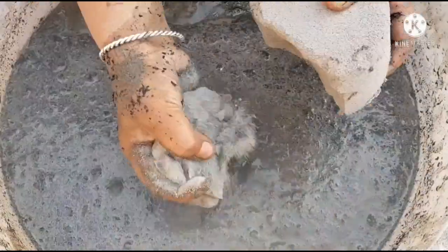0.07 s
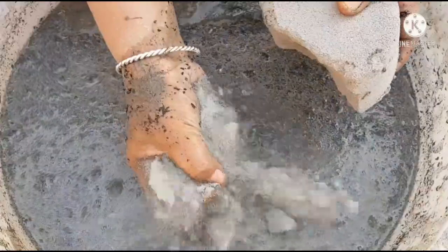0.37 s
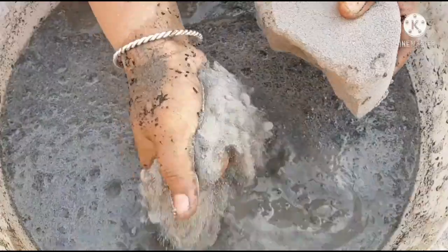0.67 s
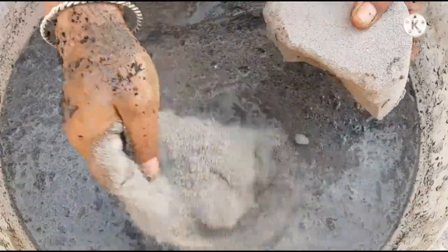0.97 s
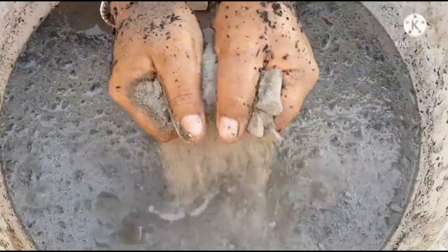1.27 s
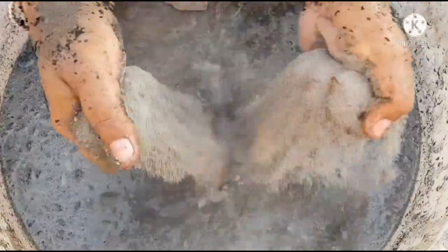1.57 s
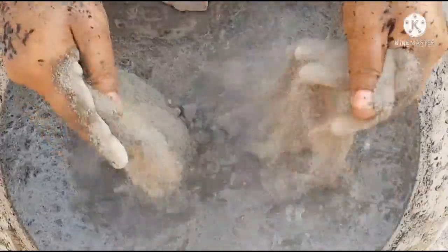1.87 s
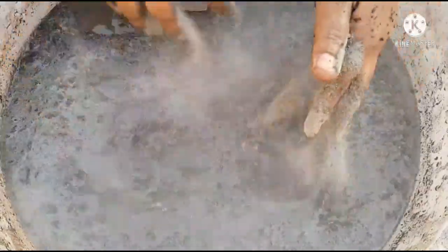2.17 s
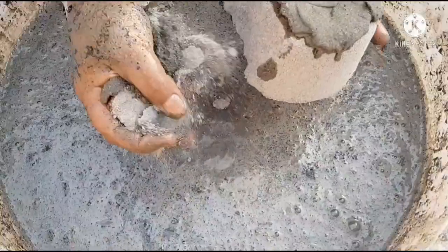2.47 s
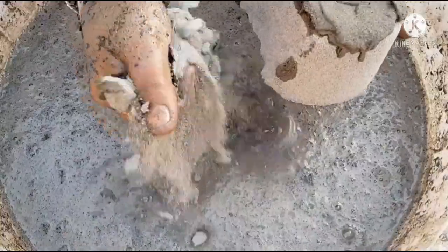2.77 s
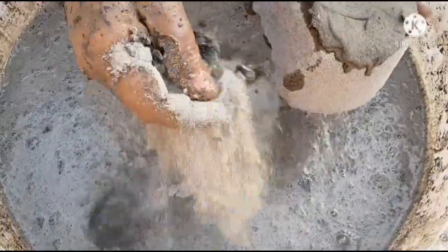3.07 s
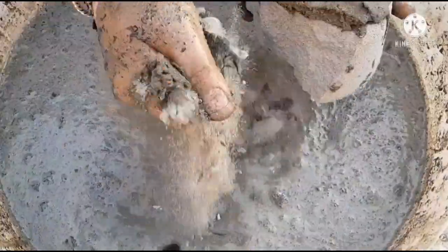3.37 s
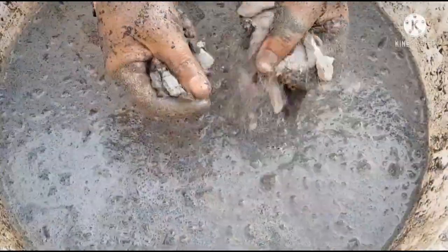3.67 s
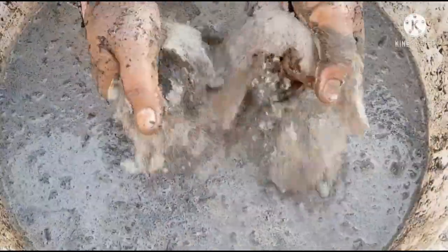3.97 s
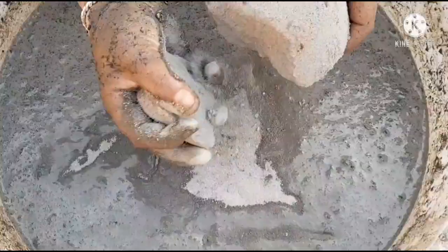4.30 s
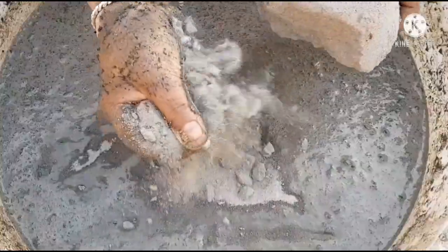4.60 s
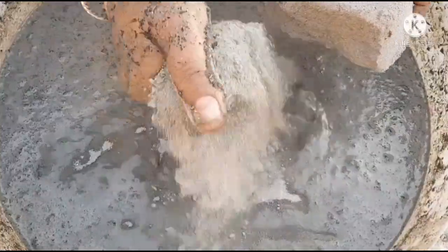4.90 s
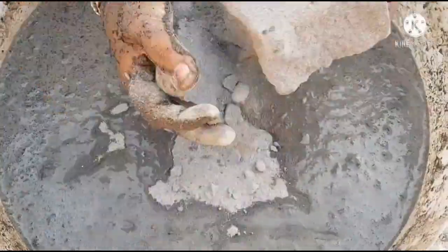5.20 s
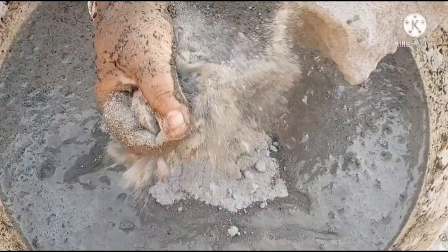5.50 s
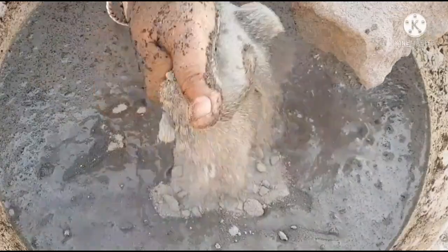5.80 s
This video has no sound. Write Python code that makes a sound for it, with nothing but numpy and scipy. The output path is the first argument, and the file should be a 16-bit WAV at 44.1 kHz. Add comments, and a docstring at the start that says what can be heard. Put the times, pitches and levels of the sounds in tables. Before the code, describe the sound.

Hands crush lumps of dry cement over a basin of muddy water, outdoors and close to the microphone. Each squeeze gives a gritty crunch over hissing powder, with sharp snaps, while larger pieces drop in with dull plops. Just past the middle comes the loudest crack, then wind rumbles briefly on the microphone and stops dead. The crumbling continues more softly, with a faint slosh and tiny wet pops.

```python
"""Outdoors, close to one microphone, hands crush lumps of dry cement over a basin of muddy water.
Each squeeze breaks many tiny grains, heard as a crunch over hissing powder, and lumps crack with sharp
snaps. Larger pieces drop in and knock the filled basin with dull plops; later the mud sloshes and pops.
A gust rumbles on the microphone for most of a second and stops dead. Faint air lies behind it all."""
import sys
import numpy as np
from scipy import signal
from scipy.fft import rfft, irfft, next_fast_len
from scipy.io import wavfile
from scipy.ndimage import uniform_filter1d

SR = 44100
rng = np.random.default_rng(int(sys.argv[2]) if len(sys.argv) > 2 else 0)


def output_pcm(signal):
    """Save a mono or channel-first signal as 16-bit PCM at the path in sys.argv[1].

    Samples are clipped to [-1, 1] before scaling.
    """
    pcm = np.clip(np.atleast_2d(signal).T, -1, 1) * 32767
    wavfile.write(sys.argv[1], SR, np.round(pcm).astype(np.int16))


N = 266805

# steady grinding between the fingers: (time [s], level [dB])
GRINDING = [(0, -28.5), (0.28, -39.5), (0.45, -37), (1.1, -29), (2.17, -31), (2.29, -38), (2.36, -39),
            (2.6, -29.5), (2.95, -29.5), (3.1, -33.5), (3.9, -32), (4.25, -30), (4.72, -39), (4.93, -35),
            (5.05, -39), (5.4, -42.5), (5.65, -37), (6.05, -37)]
# a lump gives way under a squeeze: (time of peak [s], level [dB], swell [s], fade [s])
SQUEEZES = [(0.12, -25.5, 0.33, 0.13), (0.395, -19.5, 0.039, 0.034), (0.49, -19.5, 0.028, 0.081),
            (0.694, -20.5, 0.017, 0.0088), (1.16, -24, 0.018, 0.064), (1.264, -16.5, 0.037, 0.062),
            (1.571, -21, 0.0072, 0.017), (1.684, -24.5, .03, 0.017), (2.15, -31, 0.023, 0.065),
            (2.385, -23.5, .01, 0.012), (2.43, -22.5, 0.014, .025), (2.52, -23, 0.0095, 0.016),
            (2.656, -25, 0.098, 0.13), (2.799, -24, 0.025, 0.027), (3.02, -26.5, 0.089, 0.023),
            (3.2, -23.5, 0.086, 0.081), (3.315, -24.5, 0.05, 0.035), (3.448, -25.5, 0.049, 0.1),
            (3.651, -22, .02, 0.032), (3.82, -25.5, 0.086, .05), (3.936, -24.5, 0.023, 0.036),
            (4.063, -24.5, 0.062, 0.076), (4.33, -29.5, 0.17, 0.046), (4.475, -28, 0.071, 0.1),
            (4.654, -30.5, 0.055, 0.019), (4.77, -32.5, 0.035, 0.026), (4.83, -30.5, 0.022, 0.054),
            (4.968, -29.5, 0.028, 0.027), (5.223, -31, 0.053, 0.13), (5.456, -27.5, .025, 0.026),
            (5.537, -27.5, 0.016, 0.018), (5.63, -34, 0.042, 0.013), (5.686, -24.5, 0.025, 0.036),
            (6.025, -34, 0.015, 0.03)]
# how fine the cement is: (time [s], treble tilt [dB per octave], pitch of the largest grains [Hz])
GRAIN_FINENESS = [(0.0, 3, 3070), (0.26, 1.7, 3600), (0.5, -0.5, 3080), (0.88, -2.5, 2950),
                  (0.98, 0.5, 3140), (1.4, -2, 2730), (1.8, 0.5, 3350), (1.92, 0.5, 2580), (2.33, 0, 3770),
                  (2.82, 0.2, 2720), (3.19, 3.5, 3140), (3.34, -1, 2040), (3.41, 0.5, 3100),
                  (3.81, 2.5, 2630), (3.89, -2, 3270), (4.7, -5.5, 3670), (5.24, -1, 3720),
                  (6.05, -6, 3820)]
# basic tone of the crunch: (frequency [Hz], relative level [dB])
CRUNCH_SPECTRUM = [(300, -40), (1000, -18), (1600, -9.5), (2300, -5), (3200, -7.5), (3800, -4), (4450, 2),
                   (5600, -7), (7000, 3), (8200, 0.5), (9700, -6), (11400, -5), (13500, -12), (15300, -31)]
# the loud cracks: (time [s], level [dB], pitch of the fragment [Hz], level of loose crumbs [dB])
LOUD_CRACKS = [(0.3706, -13, 6100, -15), (0.5023, -13.5, 5250, -22), (0.5714, -16.5, 4400, -18.5),
               (0.6233, -16.5, 6900, -24.5), (0.668, -14, 5470, -25), (0.727, -20, 6300, -29),
               (0.739, -8.5, 5240, -18), (0.9144, -20.5, 5400, -28), (0.9462, -22.5, 5500, -35),
               (1.0124, -17, 7200, -37), (1.0308, -21, 7200, -38), (1.077, -26, 5830, -17),
               (1.1113, -24, 6900, -32), (1.1533, -17, 7200, -36), (1.235, -9.5, 5300, -21),
               (1.2748, -13, 4700, -15), (1.296, -12, 4740, -29), (1.3082, -10.5, 4400, -18),
               (1.422, -22, 5850, -30), (1.476, -18, 5470, -29), (1.5202, -14, 4400, -28),
               (1.5283, -14.5, 5200, -25), (1.5703, -12, 4700, -27), (1.5761, -12, 5240, -28),
               (1.6265, -8, 4400, -18), (1.6468, -18.5, 8600, -35), (1.6857, -16, 11000, -32),
               (1.7316, -18.5, 6100, -25), (1.7793, -15.5, 5300, -23), (1.8686, -8.5, 5550, -23),
               (1.8818, -18, 7200, -24), (1.9075, -21, 7200, -21.5), (1.9539, -22, 10000, -31),
               (1.9912, -18, 6540, -29), (2.0005, -24, 7400, -34), (2.0358, -14.5, 7250, -37),
               (2.0777, -14, 7700, -25), (2.0958, -28, 6300, -19), (2.1048, -18.5, 6500, -33),
               (2.14, -16, 7200, -26), (2.193, -14, 7900, -42), (2.2044, -10.5, 7200, -38),
               (2.253, -23, 7200, -22.5), (2.2742, -17, 7800, -39), (2.5654, -27, 6300, -18.5),
               (2.655, -19.5, 7000, -23), (2.7196, -15, 6540, -23), (2.799, -15.5, 6900, -17.5),
               (2.8362, -19, 8300, -19.5), (2.922, -13.5, 7240, -21), (2.9463, -14, 7200, -20),
               (2.9788, -16, 8000, -28), (3.0326, -11.5, 5670, -13.5), (3.0412, -18, 8500, -19),
               (3.0668, -18, 6040, -34), (3.2246, -7.5, 11200, -16.5), (3.2313, -14, 9300, -14),
               (3.2685, -15.5, 6050, -18), (3.2791, -22, 8200, -18), (3.3063, -13.5, 6500, -21),
               (3.3185, -16, 4600, -15), (3.3327, -9.5, 8200, -23), (3.3408, -22, 6200, -18),
               (3.3588, -1.5, 6900, -9.5), (3.4818, 3.5, 4640, -11.5), (3.4848, -8, 5340, -27),
               (3.4975, -16.5, 7400, -37), (3.5475, -15, 7200, -22), (3.6922, -15, 6700, -18),
               (3.7148, -14.5, 6300, -24), (3.7562, -15, 6350, -24.5), (3.777, -15.5, 6460, -35),
               (3.8242, -7.5, 6900, -12), (3.8477, -30, 5730, -17), (4.0913, -14.5, 5100, -19.5),
               (4.4795, -17, 5470, -22), (4.9556, -21, 4700, -18.5), (4.959, -18.5, 6650, -18),
               (5.0714, -30, 5330, -31), (5.176, -28.5, 5600, -35), (5.2104, -25, 6950, -35),
               (5.333, -28, 7300, -36), (5.37, -27, 11000, -40), (5.6581, -20.5, 5870, -33),
               (5.684, -18.5, 5700, -20), (5.7429, -19.5, 5270, -25), (5.9564, -23, 4800, -24.5),
               (6.013, -27, 5530, -28)]
# fixed high resonances, probably of the microphone, that colour each snap:
# (pitch [Hz], width [Hz], relative level [dB])
MICROPHONE_RESONANCES = [(4423, 930, -1.5), (7245, 3250, 0.5), (10680, 4200, 0.5)]
# pieces that drop into the water: (time [s], level [dB], centre pitch of the knock [Hz])
FALLING_PIECES = [(0.5028, -9, 420), (0.531, -18.5, 400), (0.669, -26.5, 336), (0.69, -30.5, 310),
                  (0.7394, -15, 330), (1.252, -15, 510), (1.2748, -6, 515), (1.295, -17.5, 444),
                  (1.3081, 2, 503), (1.578, -30, 586), (1.627, -23, 209), (1.657, -32.5, 210),
                  (1.869, -27, 427), (3.335, -34, 750), (3.342, -25, 750), (3.358, -16.5, 834),
                  (3.4841, -16.5, 313), (3.487, -20.5, 810), (3.661, -31.5, 586), (3.718, -34, 600),
                  (3.824, -33.5, 800), (4.048, -23, 432), (4.058, -22, 430)]
# the ways the filled basin rings: (pitch [Hz], relative level [dB], time to fade by 60 dB [s])
BASIN_RESONANCES = [(237, 0.5, 0.038), (484, 7, 0.014), (677, -3, .024), (1082, 5.5, 0.014)]
# soft sloshing of the mud: (time [s], level [dB])
SLOSH_LEVELS = [(4.75, -85), (4.79, -45.5), (4.86, -42), (4.92, -53), (5.0, -67), (6.05, -60)]
# small wet pops: (time [s], peak level [dB])
MUD_POPS = [(5.06, -37), (5.072, -37.5), (5.955, -43), (5.984, -37.5)]
# wind on the microphone: (time [s], level [dB])
GUST_LEVELS = [(3.66, -77), (3.72, -55), (3.79, -32), (3.96, -33.5), (4.015, -16.5), (4.06, -27.5),
               (4.25, -19.5), (4.38, -27), (4.415, -11), (4.54, -18)]
# tone of the wind's rumble: (frequency [Hz], relative level [dB])
WIND_SPECTRUM = [(20, -41), (33, -10), (47, -2), (62, 3), (80, -5), (120, -10), (165, -19.5), (300, -30),
                 (600, -51), (2000, -84), (8000, -92)]
# tone of the outdoor air: (frequency [Hz], relative level [dB])
AIR_SPECTRUM = [(20, -30), (40, 0.5), (65, 1.5), (120, -1), (250, -7), (500, -10.5), (1000, -18.5),
                (2000, -22), (6000, -21.5), (16000, -27)]


def crunch(pressure, steady, cracks, clump_db, powder_db, crumbs_db, scatter_db, leak_db):
    """Grains break in clumps over hissing powder; fine dust is brighter, coarse grit reaches lower."""
    shower = np.hypot(pressure, crumb_showers(cracks, rise_s=0.00021, fade_s=0.042)) - pressure
    # a surge breaks off coarser grit: each doubling of the crunch makes it duller and lower
    doublings = np.log2((pressure + shower) / steady)
    tilt, edge_hz = in_time(GRAIN_FINENESS)
    tilt = tilt - 1.47 * doublings
    edge_hz = edge_hz * 2 ** (-0.027 * doublings)
    breaking = grains(per_s=3800, spread_db=-1.5, largest=12.0) * from_db(clump_db * drift(170))
    # a crumb collapses in a burst of noise about 2 ms long
    collapses = np.abs(grains(per_s=180, spread_db=6.0, largest=0.98))
    bursts = signal.lfilter([1], [1, -np.exp(-1 / (0.0018 * SR))], collapses + 1e-18)
    crumbs = from_db(crumbs_db) * unit_power(bursts * rng.standard_normal(N))
    powder = from_db(powder_db) * rng.standard_normal(N)
    source = colour(breaking + crumbs + powder, CRUNCH_SPECTRUM)
    # every grain has its own tone, so overlapping pitch bands waver separately
    centres_hz = np.geomspace(1400, 14000, num=17)
    size = next_fast_len(N, real=True)
    spectrum, grit = rfft(source, size), 0
    log_hz = np.log(np.linspace(1, SR / 2, len(spectrum)))
    for hz, share in zip(centres_hz, np.eye(len(centres_hz))):
        band = irfft(spectrum * np.interp(log_hz, np.log(centres_hz), share), size)[:N]
        # almost nothing rings below the pitch of the largest grains
        above_edge = np.sqrt(1 / (1 + (edge_hz / hz) ** 20) + from_db(leak_db) ** 2)
        band_db = tilt * np.log2(max(hz, 3000) / 6500) + scatter_db * drift(120)
        grit = grit + band * above_edge * from_db(band_db)
    # the hand's pressure sets how much breaks; a shower is denser and more even
    out = pressure * levelled(grit, size=1300) + shower * levelled(grit, size=130)
    return cut(out, 620, "high", order=2)


def hand_pressure():
    """Squeezes swell and fade on top of steady grinding; gives the total and the steady part."""
    t = np.arange(N) / SR
    steady = from_db(in_time(GRINDING)[0])
    power = steady ** 2
    for s, db, swell_s, fade_s in SQUEEZES:
        squeeze = from_db(db) * np.exp(-np.maximum((s - t) / swell_s, (t - s) / fade_s))
        power = power + squeeze ** 2
    return np.sqrt(power), steady


def grains(per_s, spread_db, largest):
    """Tiny breaks click at random moments, each with a random strength."""
    sizes = from_db(spread_db * np.minimum(rng.exponential(1, N), largest)) * rng.choice([-1, 1], N)
    return unit_power(sizes * (rng.random(N) < per_s / SR))


def crumb_showers(cracks, rise_s, fade_s):
    """Strength of the crumbs each crack lets go: it swells at once, then falls 60 dB in fade_s."""
    power, t = np.zeros(N), np.arange(SR // 20) / SR
    for s, *_, crumbs_db in cracks:
        shower = from_db(crumbs_db - 60 * t / fade_s) * (1 - np.exp(-t / rise_s))
        add(power, s, shower ** 2)
    return np.sqrt(power)


def snaps(cracks, detune, fall_db_per_octave, ping_db):
    """A crack's quick pushes set off high resonances, probably of the microphone, for an instant."""
    out = np.zeros(N)
    for (s, db, fragment_hz, _), chance in zip(cracks, rng.standard_normal((len(cracks), 4))):
        pushes = crack_steps(count=5, mean_gap_s=0.0007, step_loss_db=7)
        # the resonance nearest the fragment's pitch is pushed hardest
        octaves_off = np.abs(np.log2(np.array(MICROPHONE_RESONANCES)[:, 0] / fragment_hz))
        levels_db = db - fall_db_per_octave * (octaves_off - octaves_off.min())
        for k, (hz, width_hz, ring_db) in enumerate(MICROPHONE_RESONANCES):
            pitch = hz + detune * width_hz * chance[k]
            ring = double_resonance(pushes, pitch, width_hz)
            ring = ring / np.std(ring[:SR // 500])  # the first 2 ms set the level
            add(out, s, np.sign(chance[-1]) * from_db(levels_db[k] + ring_db) * ring)
    # the lowest resonance lingers as a short ping
    out = out + from_db(ping_db) * resonance(out, MICROPHONE_RESONANCES[0][0], width_hz=180)
    return cut(cut(out, 1230, "high", order=3), 13100, "low", order=4)


def crack_steps(count, mean_gap_s, step_loss_db):
    """The pushes of one crack: a first break, then weaker ones at uneven gaps."""
    pushes, luck = np.zeros(SR // 100), rng.random((count, 2))
    gaps_s = mean_gap_s * (.5 + luck[:, 0])
    at = np.minimum((np.cumsum(gaps_s) - gaps_s[0]) * SR, len(pushes) - 1).astype(int)
    pushes[at] = from_db(-step_loss_db * np.arange(count)) * np.sign(luck[:, 1] - .5)
    return pushes


def small_cracks(pressure, most_per_s, firm_db, pitch_hz, crumbs_db):
    """Small cracks come by chance, more often and louder under a firm squeeze; rows like LOUD_CRACKS."""
    step = SR // 200
    moments = np.arange(0, N, step)
    luck, chance = rng.random(len(moments)), rng.standard_normal((len(moments), 2))
    per_s = most_per_s * np.minimum(pressure[moments] / from_db(firm_db), 1) ** 2
    db = 20 * np.log10(pressure[moments]) - 0.5 * chance[:, 0]
    hz = pitch_hz * 2 ** (0.1 * chance[:, 1])
    return np.column_stack([moments / SR, db, hz, db + crumbs_db])[luck < per_s * step / SR]


def basin_echoes(x, echo_db, fade_s):
    """Hands, water surface and basin wall throw back a short spray of echoes."""
    t = np.arange(SR // 12) / SR
    echoes = rng.standard_normal(len(t)) * from_db(-60 * t / fade_s) * (t > .001)
    return x + from_db(echo_db) * signal.fftconvolve(x, echoes / np.linalg.norm(echoes))[:N]


def plops(rise_s, reach_octaves, churn_db, churn_fade_s):
    """A falling piece knocks the filled basin, big ones at low pitches; the water churns briefly."""
    out, t = np.zeros(N), np.arange(SR // 8) / SR
    for s, db, centre_hz in FALLING_PIECES:
        churn = unit_power(resonance(rng.standard_normal(len(t)), centre_hz, width_hz=270))
        knock = from_db(churn_db - 60 * t / churn_fade_s) * churn
        for hz, ring_db, fade_s in BASIN_RESONANCES:
            share = np.exp(-.5 * (np.log2(hz / centre_hz) / reach_octaves) ** 2)
            tone = np.sin(2 * np.pi * hz * rng.normal(1, 0.036) * t)
            knock += share * from_db(ring_db - 60 * t / fade_s) * tone
        add(out, s, from_db(db) * (1 - np.exp(-t / rise_s)) * knock)
    return cut(cut(out, 1140, "low", order=5), 89, "high", order=2)


def wind(end_s, click_db, click_s):
    """Swirls of air push on the microphone; the rumble stops dead with a click."""
    level_db, = in_time(GUST_LEVELS)
    swirls = from_db(level_db) * levelled(colour(rng.standard_normal(N), WIND_SPECTRUM), size=2600)
    left_s = end_s - np.arange(N) / SR
    click = np.exp(-(left_s / click_s) ** 2)
    pressure = (swirls * (1 - click) - from_db(click_db) * click) * (left_s > 0)
    return cut(cut(pressure, 2800, "low", order=2), 26, "high", order=1)


def slosh(hz, width_hz):
    """The muddy water stirs with a low, hollow sound."""
    level_db, = in_time(SLOSH_LEVELS)
    return from_db(level_db) * unit_power(double_resonance(rng.standard_normal(N), hz, width_hz))


def mud_pops(hz, width_hz):
    """Each small wet pop in the mud is one click that rings for an instant."""
    out = np.zeros(N)
    ring = double_resonance(signal.unit_impulse(SR // 50), hz, width_hz)
    for s, db in MUD_POPS:
        add(out, s, from_db(db) * ring / np.abs(ring).max())
    return out


def outdoor_air(level_db):
    """The open air is a faint, steady rumble and hiss."""
    return from_db(level_db) * colour(rng.standard_normal(N), AIR_SPECTRUM)


def from_db(db):
    """Turn decibels into a number to multiply by."""
    return 10 ** (np.asarray(db) / 20)


def unit_power(x):
    """Scale a sound to an average power of 1."""
    return x / np.sqrt(np.mean(x ** 2) + 1e-20)


def levelled(x, size):
    """Even out a sound so every stretch of size samples has a power near 1."""
    return x / np.sqrt(uniform_filter1d(x ** 2, size=size) + 1e-9)


def in_time(rows):
    """Join a table's points with straight lines: one curve for each column after the time."""
    s, *columns = np.transpose(rows)
    return [np.interp(np.arange(N) / SR, s, column) for column in columns]


def add(out, s, sound):
    """Mix a sound in at time s."""
    at = max(0, round(s * SR))
    out[at:at + len(sound)] += sound[:max(0, N - at)]


def drift(hz):
    """A smooth random wobble of typical size 1; a higher hz makes it faster."""
    r = np.exp(-40 * np.pi * hz / SR)  # one value for every 20 samples
    slow = signal.lfilter([1], [1, -2 * r, r * r], rng.standard_normal(N // 20 + 2002))[2000:]
    return np.interp(np.arange(N) / 20, np.arange(len(slow)), unit_power(slow))


def colour(x, spectrum):
    """Give a sound the tone in a spectrum table, at a power of 1."""
    size = next_fast_len(N + 8192, real=True)
    hz, db = np.transpose(spectrum)
    gain = from_db(np.interp(np.log(np.arange(size // 2 + 1) * SR / size + 1), np.log(hz), db))
    # minimum phase: the filter rings only after a click, never before it
    cepstrum = irfft(np.log(gain), size)
    cepstrum[1:size // 2] *= 2
    cepstrum[size // 2 + 1:] = 0
    return unit_power(irfft(rfft(x, size) * np.exp(rfft(cepstrum)), size)[:N])


def resonance(x, hz, width_hz):
    """Make a sound ring at one pitch; a narrower width rings longer."""
    r = np.exp(-np.pi * width_hz / SR)
    feedback = [1, -2 * r * np.cos(2 * np.pi * hz / SR), r * r]
    return signal.lfilter(np.array([1, 0, -1]) * (1 - r * r) / 2, feedback, x + 1e-18)


def double_resonance(x, hz, width_hz):
    """The same resonance twice, so less gets through away from its pitch."""
    return resonance(resonance(x, hz, width_hz), hz, width_hz)


def cut(x, hz, keep, order):
    """Keep the "low" or "high" side of hz; a higher order cuts more steeply."""
    return signal.sosfilt(signal.butter(order, hz, keep, fs=SR, output="sos"), x + 1e-18)


def scene():
    """Cement, water and air, the same on both channels."""
    pressure, steady = hand_pressure()
    small = small_cracks(pressure, most_per_s=3.6, firm_db=-25, pitch_hz=6670, crumbs_db=4.5)
    cracks = np.vstack([LOUD_CRACKS, small])
    cement = crunch(pressure, steady, cracks,
                    clump_db=2.0, powder_db=2.5, crumbs_db=-4.5, scatter_db=3.0, leak_db=-22.5)
    water = plops(rise_s=0.0019, reach_octaves=0.64, churn_db=-18.5, churn_fade_s=0.11)
    mud = slosh(hz=425, width_hz=200) + mud_pops(hz=1240, width_hz=610)
    air = outdoor_air(level_db=-48)
    gust = wind(end_s=4.5345, click_db=-12, click_s=0.0014)
    snapping = snaps(cracks, detune=0.094, fall_db_per_octave=23.5, ping_db=-18)
    snapping = basin_echoes(snapping, echo_db=-21, fade_s=0.057)
    return np.tile(cement + snapping + water + mud + gust + air, (2, 1))


def record(dry):
    """The loudest cracks overload the input, and the treble above 15600 Hz is cut."""
    clipped = np.clip(dry, -1, 1)
    return signal.sosfilt(signal.ellip(10, .1, 80, 15600, fs=SR, output="sos"), clipped)


dry = scene()
out = record(dry)
output_pcm(out)
```